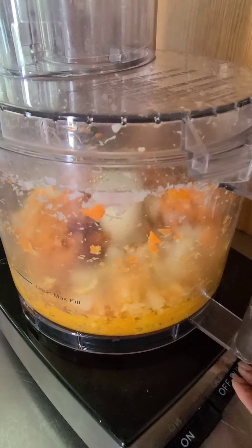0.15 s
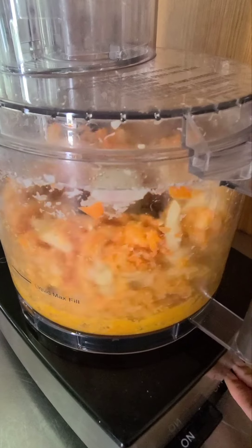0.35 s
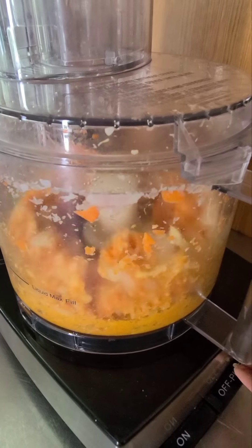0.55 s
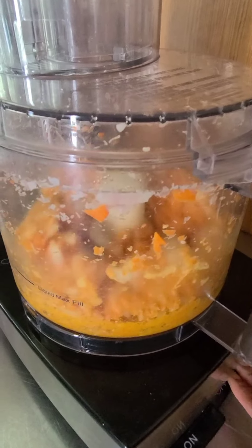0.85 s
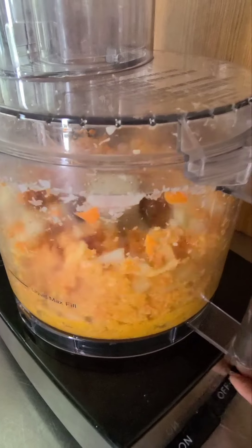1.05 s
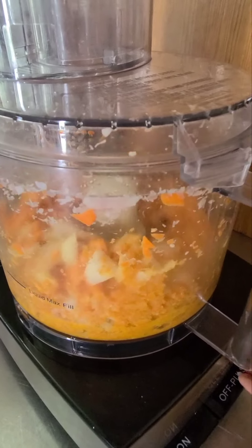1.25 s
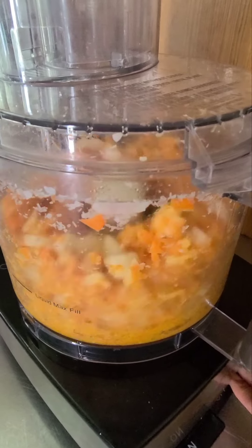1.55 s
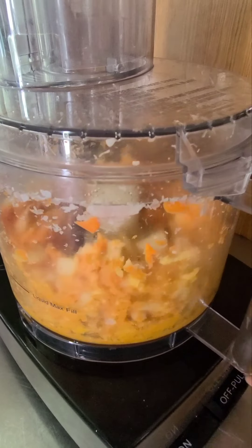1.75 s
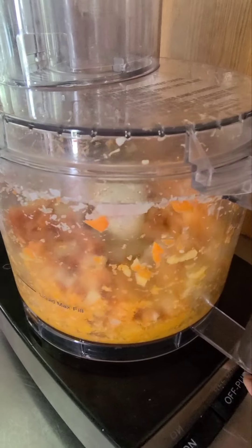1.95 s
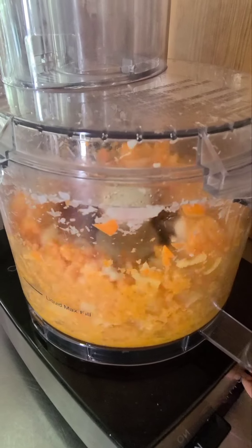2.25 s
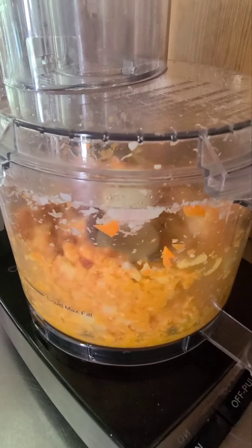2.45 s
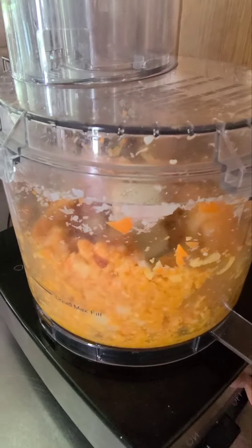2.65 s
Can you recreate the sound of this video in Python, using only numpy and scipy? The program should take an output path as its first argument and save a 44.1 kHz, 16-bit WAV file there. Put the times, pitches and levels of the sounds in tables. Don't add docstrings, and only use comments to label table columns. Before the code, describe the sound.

A food processor run dies away by 0.1 seconds, leaving faint room hum. Five chopping pulses start near 0.29, 0.93, 1.54, 2.13 and 2.74, each about a quarter second. A touch and scrape precede each sharp clack; the motor surges with low whine, rattle and hiss as vegetable bits pepper the plastic bowl. Releases click, chunks knock, the counter booms, and the blade quickly stalls; the last coasts longest.

```python
import sys
import numpy as np
from scipy import signal
from scipy.fft import rfft, irfft, next_fast_len
from scipy.io import wavfile
from scipy.ndimage import uniform_filter1d, map_coordinates

SR = 44100
rng = np.random.default_rng(int(sys.argv[2]) if len(sys.argv) > 2 else 0)


def bounce(signal):
    frames = np.transpose(np.atleast_2d(signal))
    limited = np.clip(frames, -1, 1)
    pcm = np.round(limited * 32767).astype(np.int16)
    wavfile.write(sys.argv[1], SR, pcm)


def gain_from_db(level_db):
    decades = np.asarray(level_db, float) / 20
    return 10 ** decades


N = 123479
T = np.arange(N) / SR

# power_on_s, power_off_s, stall_s, load_db
PULSES = [
    (-.32, -0.065, 0.009, -23),
    (0.285, 0.541, 0.62, -21.5),
    (0.931, 1.178, 1.236, -21.5),
    (1.542, 1.773, 1.851, -22),
    (2.133, 2.43, 2.5, -22),
    (2.743, 3.023, 3.2, -22),
]
# start_s, peak_db
KEY_TOUCHES = [
    (0.2352, -17.5),
    (0.8718, -17),
    (1.4855, -14.5),
    (2.078, -16.5),
    (2.6846, -15),
]
RISE_S = 0.051
OFF_S = 0.032


def unit(x):
    return x / np.sqrt(np.mean(x ** 2) + 1e-20)


def along(points, hz):
    f, v = np.transpose(points)
    return np.interp(np.log(hz + 1), np.log(f + 1), v)


def wobble(rate):
    return map_coordinates(rng.standard_normal(int(N * rate / SR) + 4), [T * rate])


def filtered(x, response):
    m = next_fast_len(N + 8192)
    return irfft(rfft(x, m) * response(np.fft.rfftfreq(m, 1 / SR)), m)[..., :N]


def tone(points):
    return lambda hz: gain_from_db(along(points, hz)) * (hz < 1.15 * points[-1][0])


def peaked(shape, peaks, db):
    def response(hz):
        resonances = 0
        for centre, width, level in peaks:
            bump = width * width / (width * width + 4 * (hz - centre) ** 2)
            resonances = resonances + gain_from_db(level - along(shape, centre)) * bump
        return tone(shape)(hz) * (1 + gain_from_db(db - 20) * resonances)
    return response


def patchy(x, db):
    z = signal.stft(x, nperseg=512)[2]
    field = uniform_filter1d(rng.standard_normal(z.shape[1:]), size=3, axis=0)
    field = uniform_filter1d(field, size=5, axis=1)
    return signal.istft(z * gain_from_db(db * unit(field)), nperseg=512)[1][:, :N]


def bursts(times, db, len_s):
    marks = np.bincount((times * SR).astype(int).clip(0, N - 1), gain_from_db(db), N)
    t = np.arange(SR // 20) / SR
    return np.convolve(marks, (1 - np.exp(-t / 0.00028)) * np.exp(-t / len_s))[:N]


def spread(a, b):
    # pitch_hz, correlation
    alike = [(60, 1), (380, 0.72), (2380, 0.29), (15000, -0.079)]
    # pitch_hz, level_db
    lean = [(60, 0.5), (150, -1.5), (380, -2), (950, -0.5), (2380, -7.5), (5980, 0.5), (15000, -5)]
    turn = lambda hz: np.arccos(np.clip(along(alike, hz), -1, 1)) / 2
    mid, side = filtered(np.array([a, b]), lambda hz: [np.cos(turn(hz)), np.sin(turn(hz))])
    ports = np.array([mid + side, mid - side])
    return filtered(ports, lambda hz: gain_from_db(np.outer([.5, -.5], along(lean, hz))))


def room(x, db):
    # pitch_hz, t60_s
    decay = [(150, 0.32), (1000, 0.33), (4000, 0.33), (14000, 0.36)]
    hz, t, z = signal.stft(rng.standard_normal((2, SR // 2)), SR, nperseg=256)
    tail = signal.istft(z * gain_from_db(-60 * t / along(decay, hz)[:, None]), SR, nperseg=256)[1]
    tail = tail / np.linalg.norm(tail[0])
    late = np.pad(x, ((0, 0), (200, 0)))
    return x + gain_from_db(db) * signal.fftconvolve(late, tail, axes=1)[:, :N]


def speed():
    total = 0
    for on, off, *_ in PULSES:
        run_up = 1 - np.exp(-np.maximum(T - on, 0) / RISE_S)
        total = total + run_up * np.exp(-(np.maximum(T - off, 0) / 0.15) ** 2)
    return total


def effort(coast_db_per_s, grows):
    total = 0
    for on, off, stall, load_db in PULSES:
        db = -4.5 * np.exp(-abs(T - on) / RISE_S)
        db = db + 3.5 * np.exp(-((T - on - 0.084) / 0.027) ** 2)
        db = db - 5 * np.clip((T - off) / OFF_S, 0, 1)
        db = db - coast_db_per_s * np.maximum(T - off, 0)
        db = db - 220 * np.maximum(T - stall, 0)
        total = total + gain_from_db(load_db + grows * db) * np.clip((T - on) / 0.015, 0, 1)
    return total


def kitchen():
    # pitch_hz, level_db
    quiet = [(12, -30), (20, -4), (75, -3), (135, -9), (165, -21), (240, -12), (430, -15), (560, -27),
             (1400, -35), (2850, -33), (5280, -49.5), (16200, -64)]
    # pitch_hz, width_hz, level_db
    murmur = [(3020, 60, -30), (12000, 500, -57.5)]
    mains_hz = 59.5
    octaves = np.sin(2 * np.pi * mains_hz * T) + 1.4 * np.sin(4 * np.pi * mains_hz * T)
    hum = gain_from_db(-57.5 + 5.7 * wobble(6.66)) * octaves
    hush = unit(filtered(rng.standard_normal((2, N)), peaked(quiet, murmur, 21)))
    return gain_from_db(-49 + 3.0 * wobble(2.97)) * spread(*hush) + hum


def counter():
    # start_s, pitch_hz, level_db, length_s
    booms = [(-0.004, 119, -28.5, 0.048), (0.342, 200, -14, 0.02), (0.351, 91.4, -17.5, 0.017),
             (0.556, 88, -22, 0.043), (0.606, 110, -19.5, 0.026), (.985, 85, -23.5, 0.024),
             (1.194, 87, -21, 0.032), (1.7, 395, -24.5, 0.018), (0.995, 205, -31, 0.018),
             (1.052, 124.5, -24, .015), (1.015, 150, -24, .02), (1.125, 148, -25, .025),
             (.37, 150, -21, .025), (.52, 150, -24, .03), (1.62, 150, -25, .025), (1.715, 148, -22, .03),
             (2.37, 148, -23, .035), (1.085, 295, -34, .02), (1.2, 350, -26, 0.02),
             (1.23, 189.2, -25, 0.017), (1.27, 140, -26.5, 0.017), (1.311, 315, -44, 0.036),
             (0.509, 365, -20.5, 0.01), (.02, 390, -33, .03), (.04, 240, -36, .03),
             (0.652, 150.8, -32, .03), (1.784, 87, -20, 0.023), (2.166, 356, -31, 0.017),
             (2.192, 89.92, -28, 0.037), (2.437, 84.6, -24, 0.058), (2.485, 395.4, -26, 0.03),
             (2.535, 117, -32, 0.073), (2.516, 205.7, -27.5, 0.021), (2.532, 312, -35.5, 0.036)]
    thuds = [(s + .018, 241, db - 20.5, 0.01) for s, db in KEY_TOUCHES]
    drift = np.cumsum(1 + .035 * wobble(15)) / SR
    total = 0
    for start_s, pitch_hz, db, len_s in booms + thuds:
        swell = gain_from_db(db) * np.exp(-((T - start_s) / len_s) ** 2)
        total = total + swell * np.sin(2 * np.pi * pitch_hz * drift)
    return total


def whine():
    top_hz, low = 151.5, 0.4
    climb = low + (1 - low) * np.clip(1.08 * speed(), 0, 1)
    hz = top_hz * climb * (1 + 0.025 * wobble(18))
    turn = 2 * np.pi * np.cumsum(hz) / SR
    wave = np.sin(turn) + 0.25 * np.sin(2 * turn)
    return speed().clip(0, 1) * wave * gain_from_db(-7 + wobble(16)) * effort(9.9, .7)


def motor():
    return (whine() + counter()) * gain_from_db([[-.7], [.7]])


def click(events, shape, len_s, again, db, drag_db, drag_s):
    s, peak = np.transpose(events)[:2]
    cracks = bursts(s, peak, len_s) + again * bursts(s + 0.00228, peak, len_s)
    env = cracks + gain_from_db(drag_db) * bursts(s, peak, drag_s)
    noise = rng.standard_normal((2, N))
    return gain_from_db(db) * filtered(noise * env, tone(shape)) / np.std(filtered(noise, tone(shape)))


def switch():
    # start_s, peak_db
    scrapes = [
        (0.28, -19.5),
        (0.9134, -20),
        (1.5218, -17),
        (2.1183, -16.5),
        (2.7276, -19),
    ]
    # start_s, peak_db
    clacks = [
        (0.295, -3.5),
        (0.929, -5.5),
        (1.539, -4.5),
        (2.133, -5),
        (2.743, -6),
    ]
    # start_s, peak_db
    releases = [(0.5257, -28), (0.5456, -22), (1.147, -29), (1.16, -29), (1.172, -26), (1.7563, -27),
                (1.7695, -30), (2.3937, -24.5), (2.404, -26), (2.419, -30), (2.592, -56), (2.601, -54)]
    # pitch_hz, level_db
    touch_tone = [(450, -24.5), (1250, -0.5), (1700, -6.5), (2300, 0), (4400, -19.5), (5600, -17),
                  (8000, -36), (16000, -48)]
    scrape_tone = [(240, -2.5), (400, -1.5), (852, -16.5), (1650, -0.5), (6050, -12), (6850, -6.5),
                   (8110, -24.5), (12300, -22.5), (16000, -31)]
    clack_tone = [(150, -27.5), (320, -12), (750, -3), (1700, 1.5), (4410, -10), (4990, -18), (6700, -9.5),
                  (9490, -32.5), (12300, -15), (16000, -52)]
    release_tone = [(1000, -8.5), (3000, 6.5), (6500, -2), (8000, -11.5), (12000, -12), (14000, -17),
                    (16000, -27)]
    dull_tone = [(hz, db - 12 * (hz > 7500)) for hz, db in scrape_tone]
    first_step = np.add(scrapes, [-0.00672, -4])
    late_clacks = np.add(clacks, [.001, 0])
    touch = click(KEY_TOUCHES, touch_tone, 0.0017, 0.33, -2.4, -14.5, 0.034)
    scrape = click(scrapes, scrape_tone, 0.0015, 1.0, -4.5, -7, 0.023)
    scrape = scrape + click(first_step, dull_tone, 0.0019, 0.27, -1.5, -11, 0.0089)
    clack = click(late_clacks, clack_tone, 0.00056, 0.42, 3.53, -15.0, 0.016)
    release = click(releases, release_tone, 0.0026, 0.36, 2.9, -3, 0.011)
    return touch + scrape + clack + release


def knocks():
    # start_s, peak_db, pitch_hz, ring_t60_s
    chunks = [(0.33, -13, 1900, 0.047), (.357, -14, 2500, 0.036), (.368, -10, 795, 0.089),
              (.374, -13.5, 3050, .04), (.522, -19, 2030, 0.038), (.555, -3, 1900, .03),
              (.564, -16.5, 798, .08), (0.588, -16, 1000, 0.048), (.596, -17, 2980, .02),
              (.604, -13, 3030, .025), (.61, -18, 789, 0.11), (.655, -30, 793, 0.069),
              (.736, -40, 1880, .05), (0.962, -12.5, 1810, 0.06), (.999, -16, 793.3, 0.062),
              (1.08, -13, 3100, .04), (1.128, -13, 3120, .04), (1.161, -18, 1133, .05),
              (1.183, -6, 1851, .06), (1.209, -17, 1150, 0.1), (1.227, -9, 1150, 0.069),
              (1.556, -10, 1880, 0.063), (1.607, -13, 2620, .03), (1.612, -13, 765.5, .06),
              (1.62, -10, 2240, 0.05), (1.703, -7.5, 3050, .04), (1.731, -10.5, 1124, .05),
              (1.75, -6, 3097, 0.027), (1.799, -20, 1150, .06), (1.829, -9, 3074, 0.02),
              (1.947, -36, 2150, .04), (2.146, -8.5, 1890, .1), (2.202, -14, 1930, 0.044),
              (2.218, -6.5, 755, 0.069), (2.372, -12.5, 772.3, 0.071), (2.387, -6, 1482, 0.047),
              (2.404, -11, 1993, .03), (2.422, -14, 3080, .04), (2.436, -18, 1830, 0.046),
              (2.449, -8.5, 791, 0.094), (2.4778, -7, 1862, 0.074), (2.481, -14, 1150, 0.12),
              (2.493, -11, 2890, .04), (2.499, -29.5, 1827, 0.078), (2.565, -32.5, 784, .08),
              (2.58, -40, 1890, 0.09), (2.774, -9.5, 1810, 0.042)]
    # pitch_hz, level_db, t60_s
    wall_modes = [(1150, -9, 0.025), (1880, -13, 0.027), (3033, 2.5, 0.018), (4473, -3, 0.014)]
    # pitch_hz, level_db
    crack_tone = [(700, -5.5), (2900, 4.5), (4600, -9.5), (7500, -20)]
    out = np.zeros((2, N + SR))
    t = np.arange(SR // 8) / SR
    onset = 1 - np.exp(-t / 0.0013)
    for start_s, peak_db, own_hz, ring_s in chunks:
        own = gain_from_db(-6.5 - 60 * t / ring_s) * np.sin(2 * np.pi * own_hz * t)
        for side in out:
            ring = own
            for hz, level, t60 in wall_modes:
                fade = gain_from_db(-8 + level + rng.normal(0, 0.8) - 60 * t / t60)
                ring = ring + fade * np.sin(2 * np.pi * hz * rng.normal(1, 0.015) * t)
            side[round(start_s * SR):][:len(t)] += gain_from_db(peak_db) * onset * ring
    return out[:, :N] + click(chunks, crack_tone, 0.00095, 0.27, -7, -10.0, 0.0019)


def blade_strikes():
    shaft_hz, jitter, size_db = 29.27, 0.334, 2.5
    passes = np.cumsum(2 * shaft_hz * (.15 + speed())) / SR
    turns = np.flatnonzero(np.diff(np.floor(passes))) / SR
    draw = rng.standard_normal((200, 2))[:len(turns)]
    return unit(bursts(turns + jitter * draw[:, 0] / (2 * shaft_hz), size_db * draw[:, 1], 0.01))


def bit_strikes():
    bits = rng.random((4000, 2))[:int(700 * N / SR)]
    return unit(bursts(bits[:, 0] * N / SR, -2.5 * np.log(bits[:, 1] + 1e-4), 0.00027))


def bowl_ring(noise, drive):
    # pitch_hz, level_db
    bits_tone = [(24, -55), (40, -13.5), (138, -7), (384, -9), (523, -16), (798, -10), (891, -18.5),
                 (3080, -16.5), (8000, -48.5), (10400, -51), (17600, -120)]
    # pitch_hz, width_hz, level_db
    bowl_modes = [(390, 95, -7), (779, 23, -0.5), (1150, 217, -6), (1880, 127, -7.5), (4470, 280, -21),
                  (3080, 190, -13.5)]
    slack_hz, slack_db = 1300, -4
    ring = peaked(bits_tone, bowl_modes, 11)
    scale = np.std(filtered(noise[0] * drive, ring))
    bowl = filtered(noise * drive * effort(15.5, 1.0), ring) / scale
    coasting = sum(np.clip((T - off) / OFF_S, 0, 1) * (T < stall + .2) for on, off, stall, _ in PULSES)
    treble = filtered(bowl, lambda hz: hz ** 2 / (hz ** 2 + slack_hz ** 2))
    return bowl - (1 - gain_from_db(slack_db * coasting)) * treble


def fan_air(noise, drive):
    # pitch_hz, level_db
    air_tone = [(3820, -8), (6500, -4), (6990, -4), (7870, -20.5), (9710, -16), (12100, -12), (13500, -20),
                (15200, -22), (16200, -27)]
    shut = [(0.97 * air_tone[0][0], -40)] + list(air_tone)
    return gain_from_db(-18.5) * unit(filtered(noise * (1 + 0.16 * drive), tone(shut))) * effort(104, 0.97)


def gear_mesh(blades):
    mesh = lambda hz: 1 / (1 + (2 * (hz - 3075) / 280) ** 2)
    rattle = unit(filtered(rng.standard_normal((2, N)), mesh))
    return rattle * speed() ** 2 * effort(150, 1.0) * gain_from_db(-13.5 + 3.2 * wobble(8.15)) * (0.59 + blades)


def chopping():
    blades = blade_strikes()
    rush = gain_from_db(3.5 + 1.2 * wobble(13.72))
    drive = gain_from_db(-2.5) * blades + gain_from_db(-7) * bit_strikes() + rush
    noise = patchy(rng.standard_normal((4, N)), 3)
    return spread(*(bowl_ring(noise[:2], drive) + gear_mesh(blades) + fan_air(noise[2:], drive)))


def scene():
    machine = room(chopping() + motor(), -13)
    hits = room(spread(*(switch() + knocks())), -13.5)
    return machine + hits + kitchen()


def band_limit(x):
    return signal.sosfilt(signal.butter(12, 16340, fs=SR, output="sos"), x)


def record(dry):
    clipped = dry / (1 + abs(dry / 1.3) ** 4) ** 0.19
    mix = filtered(clipped, lambda hz: hz < 16340)
    return band_limit(mix)


dry = scene()
out = record(dry)
bounce(out)
```